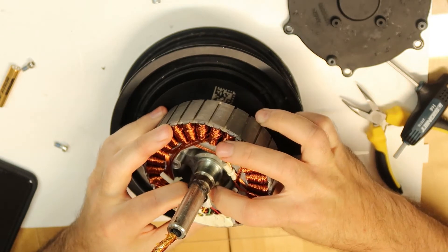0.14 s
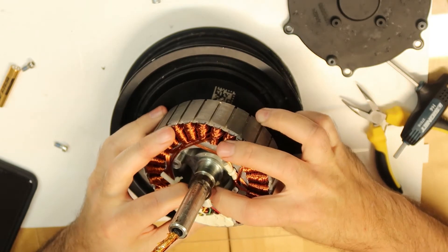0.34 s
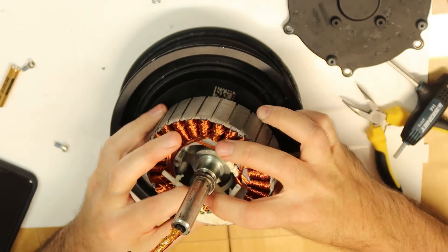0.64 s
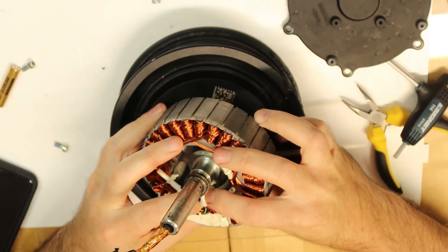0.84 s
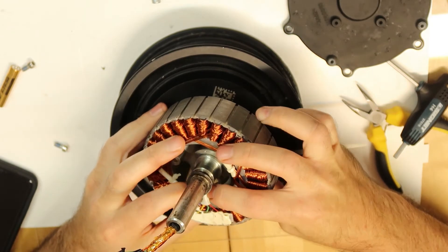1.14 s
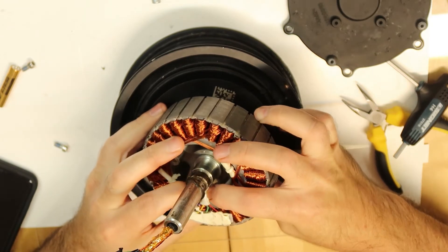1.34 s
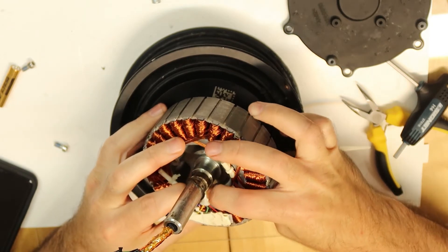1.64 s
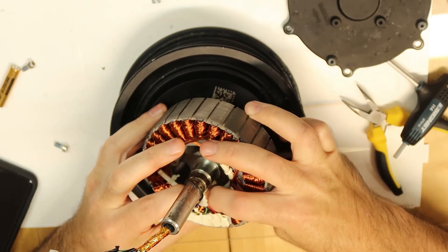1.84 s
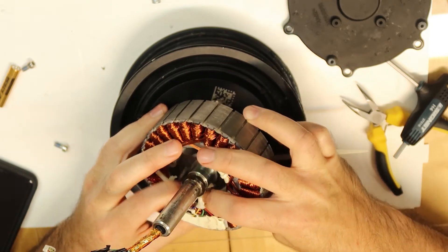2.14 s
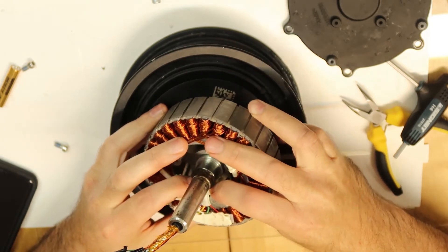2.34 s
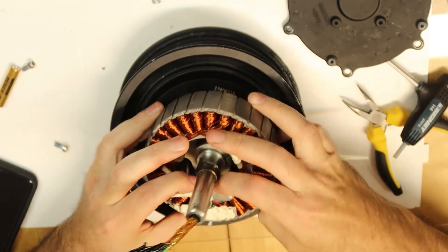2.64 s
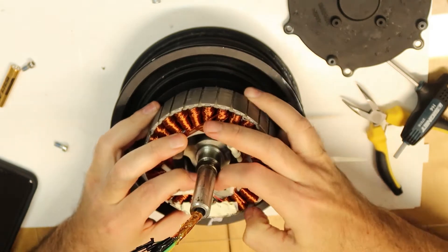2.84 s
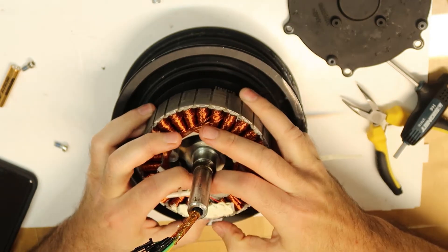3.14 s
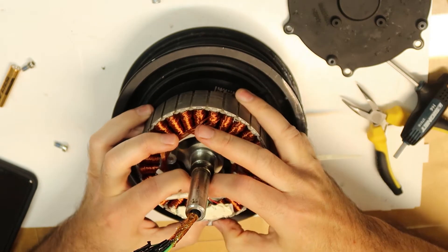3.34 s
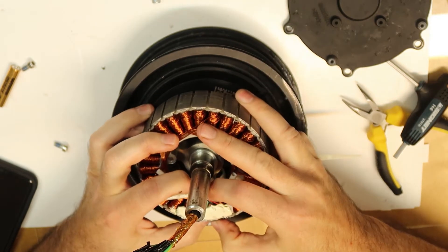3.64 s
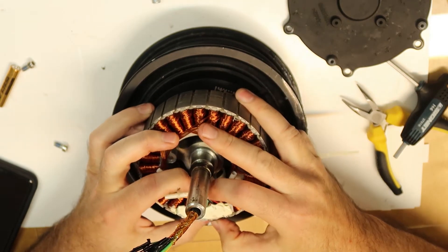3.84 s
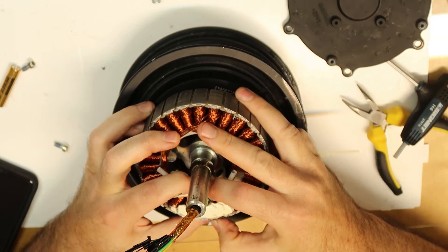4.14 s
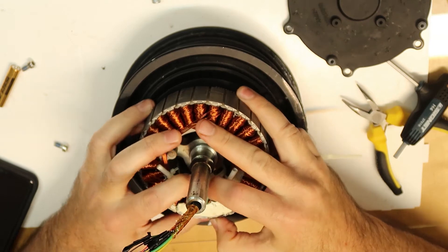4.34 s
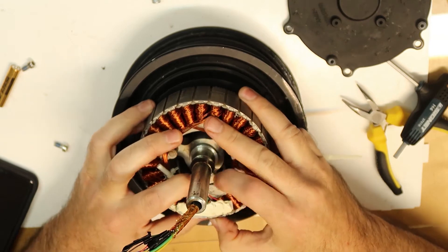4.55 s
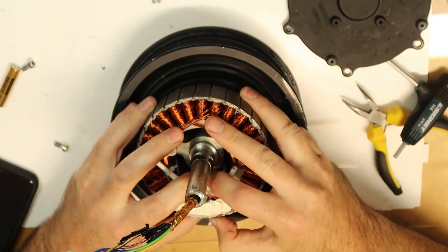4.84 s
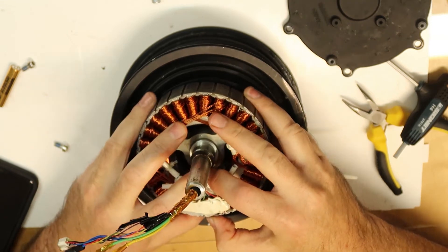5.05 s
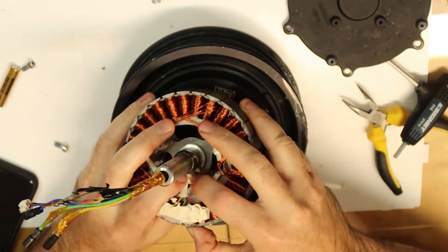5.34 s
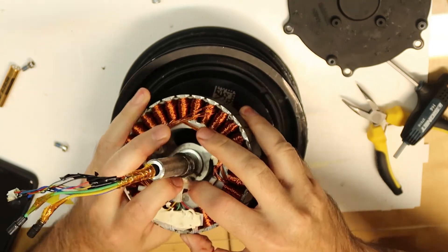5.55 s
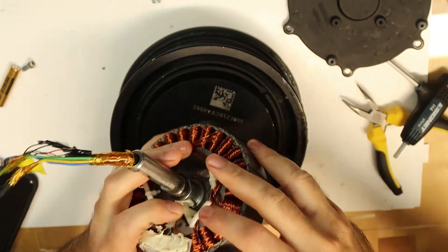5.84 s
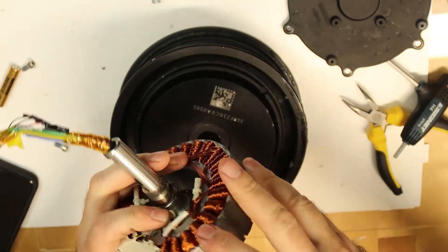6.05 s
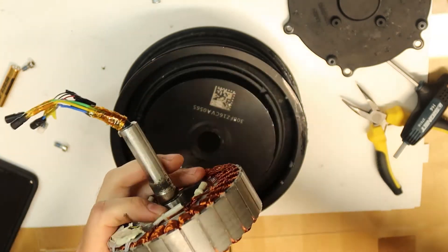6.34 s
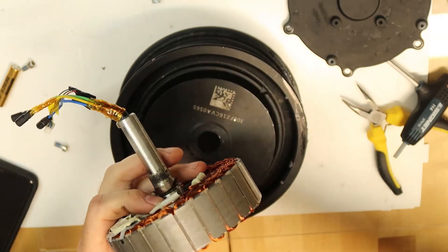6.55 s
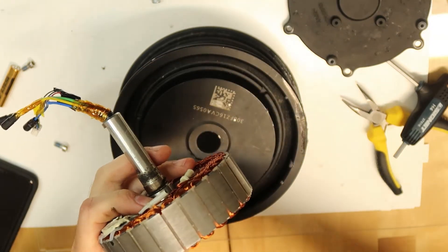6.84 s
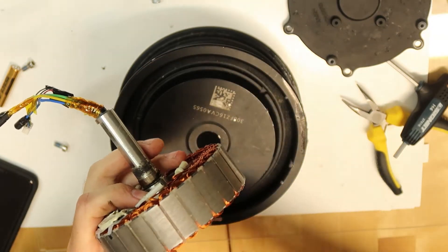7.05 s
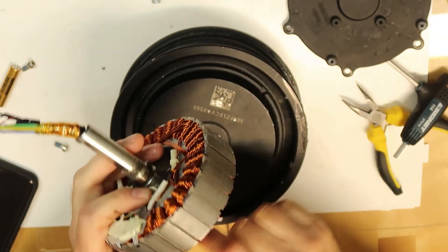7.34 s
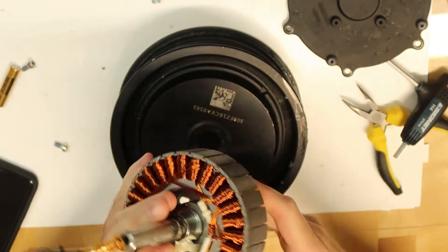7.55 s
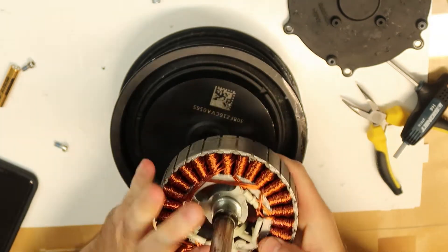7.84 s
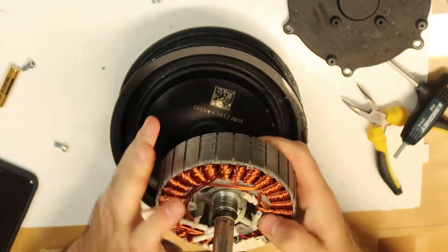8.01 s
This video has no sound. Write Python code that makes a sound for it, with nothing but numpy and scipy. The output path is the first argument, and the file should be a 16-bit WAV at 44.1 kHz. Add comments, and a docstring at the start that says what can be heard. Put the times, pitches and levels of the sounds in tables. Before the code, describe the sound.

Close view of hands working a heavy motor core out of its metal housing on a workbench. Small ticks and a soft thump come first, then one loud, deep clunk with a hard metallic knock that chatters briefly. Low, muffled bumps and faint steel ticks follow, then a dry rattle of a loose part and tiny clinks. Quiet small room, close microphone, short tail, soft room noise.

```python
"""Motor stator worked loose on a bench

A heavy motor stator is worked loose from its housing on a workbench in a quiet room, then lifted out and turned.
Its weight thuds into the modes of the bench top; housing, loose part, steel and a small part ring in modes too.
Small hard contacts snap as filtered noise bursts. Sharp sounds and thuds leave a short noise-built room tail.
Underneath lie a bench murmur fed by hand pressure and a soft, steady room noise."""
import sys
import numpy as np
from scipy import signal
from scipy.fft import rfft, irfft
from scipy.io import wavfile

SR = 44100
rng = np.random.default_rng(int(sys.argv[2]) if len(sys.argv) > 2 else 0)


def inscribe(sig):
    """Save sig as 16-bit PCM at rate SR to the path in sys.argv[1].

    A 1-D sig is mono; a 2-D sig holds one channel per row.
    Samples are clipped to [-1, 1] before scaling.
    """
    pcm = np.round(np.clip(np.atleast_2d(sig).T, -1, 1) * 32767)
    wavfile.write(sys.argv[1], SR, pcm.astype(np.int16))


N = 360738  # samples


def from_db(db):
    """Gain of a level in dB."""
    return 10 ** (np.asarray(db) / 20)


def rms_one(x):
    """Scaled to unit rms."""
    return x / np.sqrt(np.mean(x ** 2) + 1e-20)


def at_hz(points, hz, column=1):
    """One column of a table, interpolated on a log-frequency axis."""
    table = np.array(points)
    return np.interp(np.log(np.maximum(hz, 1)), np.log(table[:, 0]), table[:, column])


def add(into, s, sound):
    """Mixes a short sound in at a time in seconds."""
    i = round(s * SR)
    into[i:i + len(sound)] += sound[:N - i]


def ring(force, hz, t60_s):
    """Two-pole resonator: a unit click sets a decaying sine of height 1 ringing."""
    radius = from_db(-60 / (t60_s * SR))
    angle = 2 * np.pi * hz / SR
    feedback = [1, -2 * radius * np.cos(angle), radius * radius]
    return signal.lfilter([0, np.sin(angle)], feedback, force + 1e-18)


def favouring(favoured_hz, octave_db):
    """Mode weighting in dB: octave_db times the squared distance in octaves from the pitch favoured_hz."""
    return lambda hz: octave_db * np.log2(hz / favoured_hz) ** 2


SCATTER_DB, DETUNE = 1.5, 0.006  # largest random change of a mode per blow: level (+-dB), pitch (+-fraction)
BASS_LAG_CYCLES = 0.38  # each mode starts this part of its own cycle late


def struck(modes, force, weight_db, spread_ms, together=False):
    """One blow sets all modes ringing, each with its own strength, delay, pitch shift and (unless together) sign."""
    luck = rng.random((len(modes), 4))
    gains = from_db([db + weight_db(hz) for hz, db, t60_s in modes])
    out = np.zeros(SR // 2)
    for gain, (hz, db, t60_s), (sign, strength, wait, shift) in zip(gains, modes, luck):
        late_force = np.zeros(SR // 2)
        add(late_force, wait * spread_ms / 1000 + BASS_LAG_CYCLES / hz, force)
        polarity = 1 if together else np.sign(sign - 0.5)
        height = polarity * gain * from_db(SCATTER_DB * (2 * strength - 1))
        out += height * ring(late_force, hz * (1 + DETUNE * (2 * shift - 1)), t60_s)
    return out / np.sqrt(np.sum(gains ** 2)) / force.sum()


# Weight landing on the bench. Each row: start in seconds, level in dB,
# bass tilt in dB per octave below PIVOT_HZ, treble tilt in dB per octave above it.
THUDS = [(0.666, -34.5, -1, 3.5), (0.684, -36, -12, -17), (0.709, -30, -10.5, -11), (0.985, -18, -10, -4),
         (2.2, -36, 19, -4), (2.62, -20.5, -18, -10.5), (2.697, -3, -2.5, -1), (2.716, -14.5, -25, 6),
         (2.735, -17, 4, 8), (2.849, -22.5, -0.5, -3.5), (2.971, -42.5, -15, -6), (3.016, -43, -15, -13),
         (3.099, -42.5, -28, 3), (3.308, -20.5, -12.5, -9.5), (3.736, -36, 10, 13), (3.83, -39, 5.5, -2),
         (4.077, -33, 16, 14), (4.259, -24.5, -24, -12), (4.403, -30, -2, -17), (4.549, -39, 1, 1.5),
         (4.692, -37, 3, -9), (4.814, -24.5, -9.5, -1), (4.875, -28, 8.5, 7), (4.943, -23.5, -13.5, -12),
         (4.959, -26, -11, 2.5), (5.069, -41.5, 13, -8), (5.262, -37.5, 3, 3.5), (5.387, -45, 7.5, 13)]
# Bench-top modes. Each row: frequency in Hz, level in dB, t60 in seconds.
BENCH_MODES = [(30, -11.5, 0.25), (66, -0.5, 0.43), (96.1, -3.5, 0.56), (115.1, 6.5, 0.29), (147, 2, 0.26),
               (200.6, 0.5, 0.1), (213.2, -2, 0.27), (230.2, 0.5, 0.25), (276.3, -9.5, 0.31),
               (313.2, 2.5, 0.18), (366, -2, 0.18), (382, -6.5, 0.3), (419, 0.5, 0.22), (456.2, -4.5, 0.2),
               (514.3, -2, 0.15), (547, -1.5, 0.24), (616, -12, 0.07), (657, -18, 0.18), (746, -16, 0.28),
               (770, -14, 0.089), (861, -12.5, 0.07)]
PIVOT_HZ, LANDING_SPREAD_MS = 220, 0.94
RAP_HZ, RAP_DB = 480, -5  # extra weight of the modes above RAP_HZ
BENCH_RADIATES_HZ = 85  # below this the two faces of the bench top cancel each other


def thuds():
    """A soft push of about 1 ms excites the bench; each landing has its own bass and treble tilt about PIVOT_HZ."""
    out = np.zeros(N)
    push = np.hanning(40)
    for s, db, bass_db, treble_db in THUDS:
        def tilt(hz):
            octaves = np.log2(hz / PIVOT_HZ)
            return bass_db * max(-octaves, 0) + treble_db * max(octaves, 0) + RAP_DB * (hz > RAP_HZ)
        add(out, s, from_db(db) * struck(BENCH_MODES, push, tilt, LANDING_SPREAD_MS, together=True))
    radiation = signal.butter(2, BENCH_RADIATES_HZ, "high", fs=SR, output="sos")
    return signal.sosfilt(radiation, out)


# Housing knocked hard, bouncing and chattering. Each row: start in seconds, level in dB,
# reference pitch in Hz, weight one octave away in dB.
KNOCKS = [(2.6974, -7.5, 3100, 1.5), (2.7055, -31, 3100, 3), (2.719, -34, 2700, -10),
          (2.738, -29, 3100, -5), (2.755, -39, 3100, -20), (2.783, -31.5, 2300, -33),
          (2.838, -42, 3100, -60), (2.851, -42, 3100, -60), (2.872, -45, 3100, -58),
          (2.899, -45, 2540, -250), (2.919, -42, 2550, -250)]
# Housing modes. Each row: frequency in Hz, level in dB, t60 in seconds.
HOUSING_MODES = [(950, -14, 0.041), (1090, -7.5, 0.012), (1300, -7, 0.021), (1634, -10.5, 0.06),
                 (1830, -2.5, 0.011), (2023, -13.5, 0.06), (2300, -16, 0.12), (2350, -12.5, 0.13),
                 (2476, -10, 0.11), (2650, -6.5, 0.03), (2720, -24, 0.095), (2730, -29, 0.11),
                 (2960, -13, 0.015), (3030, -24, 0.2), (3070, 7, 0.02), (3106, -32, 0.18),
                 (3200, -27, 0.061), (3160, -10, 0.017), (3870, -20, 0.015), (4200, -27, 0.073),
                 (4540, -17, 0.044)]


def knock():
    """Housing modes driven by a pulse a little blunter than a click."""
    out = np.zeros(N)
    for s, db, reference_hz, octave_db in KNOCKS:
        weight = favouring(reference_hz, octave_db)
        add(out, s, from_db(db) * struck(HOUSING_MODES, np.hanning(12), weight, spread_ms=0.3))
    return out


# Hard little snaps. Each row: start in seconds, nominal peak in dB, body pitch in Hz,
# ring over body in dB, treble over body in dB, room send in dB.
SNAPS = [(0.129, -44.5, 1420, -4, 28, -2), (0.629, -48, 3750, -2, -3, -1), (0.657, -40, 6050, 19, -10, -9),
         (0.668, -24.5, 2470, -11, -5, -2), (0.672, -37, 5940, 0, -10, -2),
         (0.7012, -27, 3070, 5, -12, -14), (0.95, -34, 3830, 2, -17, -8), (2.093, -44, 1710, -21, -11, -4),
         (2.593, -51.5, 2490, -17, 2, 11), (2.849, -50, 3000, -1, -7, -13),
         (3.731, -49.5, 2110, 12, -11, 4), (3.821, -46, 2400, -4, 0, -1),
         (4.257, -30.5, 3150, -30, -2.5, -7), (4.547, -50, 2440, -23, -14, 3), (4.817, -44, 2340, -8, 0, 5),
         (5.103, -53, 1440, -11, 9, -3), (5.397, -43.5, 2360, -4, -18, 0), (5.634, -49, 2520, -1, -3, 6),
         (5.682, -45.5, 4440, -10, 1, -3), (5.799, -25, 1460, -10, -25, -6),
         (5.884, -44, 1350, -18, -11, 1), (6.234, -45, 2370, -4, -9, 2), (6.798, -23, 1120, -3, 5.5, 0.5),
         (6.824, -24, 2020, -26, -3, 4.5), (6.863, -20, 1900, -12, 0, -1.5), (6.833, -34, 3580, -5, -6, -6),
         (6.873, -26, 1380, -11, 1, -19), (6.946, -16, 1900, -14, 3.5, -3),
         (6.976, -18.5, 1910, -8, 1.5, -0.5), (7.016, -18, 3170, -2, -1.5, -3),
         (7.093, -20.5, 2140, -16, 0.5, -4.5), (7.37, -47, 2840, 3, -15, -5),
         (7.555, -39, 2140, -21, -14, -2.5), (7.656, -47, 5970, -24, 2, 7),
         (7.914, -47.5, 1070, -13, 15, 0)]
SNAP_CREST_DB = 21.5  # nominal peak over rms
BODY_Q, RING_Q, TREBLE_HZ = 0.85, 14.0, 4850
WINDOW_MS, DECAY_MS = 1.7, 1.7 / 0.3  # time constants before and after whitening


def snaps():
    """Short bursts through a broad body resonance, a narrow ring and a bright edge: sound close by, room send."""
    near, far = np.zeros(N), np.zeros(N)
    t_ms = np.arange(1500) / SR * 1000
    noises = rng.standard_normal((len(SNAPS), 1500))
    edge = signal.butter(2, TREBLE_HZ, "high", fs=SR, output="sos")
    for (s, db, hz, ring_db, treble_db, room_db), noise in zip(SNAPS, noises):
        spectrum = rfft(noise * np.exp(-t_ms / WINDOW_MS))
        whitened = irfft(spectrum / np.abs(spectrum))
        burst = whitened * np.exp(-t_ms / DECAY_MS)
        body = signal.lfilter(*signal.iirpeak(hz, BODY_Q, fs=SR), burst)
        body = signal.lfilter(*signal.butter(2, 0.33 * hz, "high", fs=SR), body)  # too small to radiate bass
        narrow = signal.lfilter(*signal.iirpeak(hz, RING_Q, fs=SR), burst)
        treble = signal.sosfilt(edge, burst)
        blend = rms_one(body) + from_db(ring_db) * rms_one(narrow) + from_db(treble_db) * rms_one(treble)
        snap = from_db(db - SNAP_CREST_DB) * rms_one(blend)
        add(near, s, snap)
        add(far, s, from_db(room_db) * snap)
    return near, far


# Loose part rattling. Each row: start in seconds, level in dB, reference pitch in Hz, weight one octave away in dB.
RATTLES = [(6.799, -26, 1150, 0), (6.823, -31, 1600, 3), (6.863, -32, 1900, -3), (6.945, -28, 4000, -11),
           (6.976, -29, 1900, -0.5), (7.017, -30, 3370, -2), (7.094, -39, 2900, -5)]
# Loose-part modes. Each row: frequency in Hz, level in dB, t60 in seconds.
LOOSE_PART_MODES = [(1130, -2, .05), (1700, 0, .04), (1900, 0, .035), (2750, -7, .03), (3300, -5, .025),
                    (3750, -5, .025), (4600, -9, .02), (5840, -6, .025), (6500, -8, .02), (10200, -5, .012),
                    (12700, -6, .012), (14700, -8, .012)]


def rattle():
    """Clicks set the loose part's modes ringing, each contact in a colour of its own."""
    out = np.zeros(N)
    for s, db, reference_hz, octave_db in RATTLES:
        weight = favouring(reference_hz, octave_db)
        add(out, s, from_db(db) * struck(LOOSE_PART_MODES, np.ones(1), weight, spread_ms=0.8))
    return out


# Steel touching steel. Each row: start in seconds, level in dB, brightness in dB per octave about 2480 Hz.
TOUCHES = [(0.9864, -37, -13.5), (1.039, -48, -25), (1.139, -60.5, -19), (1.7222, -47.5, -2.5),
           (2.6235, -44, -23), (2.689, -43, -8), (2.715, -40, -2.5), (2.737, -38, -12), (2.8, -62, -12),
           (2.918, -54, -25), (3.057, -49, -15), (3.122, -65, -4), (3.829, -54, -15), (4.818, -38.5, 0.5),
           (4.885, -49.5, -4), (4.972, -53, -4)]
# Steel modes. Each row: frequency in Hz, level in dB, t60 in seconds.
STEEL_MODES = [(2390, -3, .04), (2445, -6, .16), (2485, -9, .12), (4170, -4, .12), (4225, -6, .1),
               (4334, -8, .08), (4520, -7, .05), (7320, -6, .08), (10550, -11, .06), (11430, -13, .05),
               (12880, -11, .06)]


def steel_touches():
    """Light hard contacts: single clicks into the steel modes."""
    out = np.zeros(N)
    for s, db, tilt_db in TOUCHES:
        touch = struck(STEEL_MODES, np.ones(1), lambda hz: tilt_db * np.log2(hz / 2480), spread_ms=0.26)
        add(out, s, from_db(db) * touch)
    return out


# Small part clinking. Each row: start in seconds, level in dB, favoured pitch in Hz.
CLINKS = [(7.657, -53, 9400), (7.66, -52, 9300), (7.678, -57, 4300), (7.692, -52, 3800), (7.718, -55, 4400),
          (7.762, -63, 9000), (7.697, -60, 6100), (7.71, -61, 6200), (7.918, -57, 4500), (8.065, -59, 7500)]
# Small-part modes. Each row: frequency in Hz, level in dB, t60 in seconds.
SMALL_PART_MODES = [(4190, -2, 0.06), (4370, 0, .07), (5500, 4, .07), (5660, -3, 0.06), (6160, 6, 0.08),
                    (7900, -6, 0.18), (10230, -4, 0.088), (13000, -10, .15)]
CLINK_OCTAVE_DB = -90  # weight one octave from the favoured pitch


def clinks():
    """Single clicks into the small part, each sounding mainly the modes near its favoured pitch."""
    out = np.zeros(N)
    for s, db, favoured_hz in CLINKS:
        weight = favouring(favoured_hz, CLINK_OCTAVE_DB)
        add(out, s, from_db(db) * struck(SMALL_PART_MODES, np.ones(1), weight, spread_ms=0.31))
    return out


# Early reflections. Each row: delay in ms, level in dB, lowpass corner in Hz.
REFLECTIONS = [(1.7, -6.5, 14000), (6.5, -3.5, 3000)]


def echoes(x):
    """The direct sound plus duller early reflections off bench and wall."""
    out = x.copy()
    for ms, db, lowpass_hz in REFLECTIONS:
        dulled = signal.lfilter(*signal.butter(1, lowpass_hz, fs=SR), x)
        add(out, ms / 1000, from_db(db) * dulled)
    return out


# Room tail. Each row: frequency in Hz, t60 in seconds, gain on band noise in dB, side over mid in dB.
ROOM = [(314, 0.48, -40.5, -35), (850, 0.36, -22.5, -21), (1960, 0.39, -26, -16), (5230, 0.41, -23, -3),
        (8200, 0.52, -31, 2.5), (14000, 0.36, -31.5, 7)]
GRAIN_DB, GRAIN_S, BUILD_MS = 2.5, 0.06, 1.6  # unevenness, its time constant, linear onset


def room(x):
    """Convolution with half-octave noise bands, each with its own decay and width; uneven at first, then smooth."""
    t = np.arange(SR // 2) / SR
    white = rng.standard_normal((2, 2, len(t)))
    edges_hz = 150 * 2 ** np.arange(0, 7.1, 0.5)
    tail = 0
    for k, (low, high) in enumerate(zip(edges_hz, edges_hz[1:])):
        band = signal.butter(2, [low, high], "band", fs=SR, output="sos")
        mid, side = signal.sosfilt(band, white[k % 2])
        hz = np.sqrt(low * high)
        decay = from_db(at_hz(ROOM, hz, column=2) - 60 * t / at_hz(ROOM, hz, column=1))
        width = from_db(at_hz(ROOM, hz, column=3))
        tail = tail + decay * (mid + width * side * [[1], [-1]])
    steps = np.repeat(rng.standard_normal(len(t) // 50), 50)
    tail = tail * from_db(GRAIN_DB * steps * np.exp(-t / GRAIN_S))
    tail = tail * np.minimum(t * 1000 / BUILD_MS, 1)
    return signal.fftconvolve(x[None], tail, axes=1)[:, :N]


# Hands pressing and shifting the load. Each row: time in seconds, murmur level in dB.
PRESSING = [(0, -57.5), (.6, -55), (1.3, -59.5), (1.6, -54.5), (3, -53.5), (3.5, -55.5), (4.1, -52),
            (4.45, -48), (4.6, -56), (5, -51), (5.498, -57.5), (6.4, -58.5), (7, -55), (8.18, -58.5)]


def bench_murmur():
    """Noise from unsteady hand pressure feeds the bench modes without a break."""
    s, db = np.transpose(PRESSING)
    force = rng.standard_normal((2, N))
    hum = np.zeros(N)
    for k, (hz, mode_db, t60_s) in enumerate(BENCH_MODES):
        weighted_db = mode_db - 4.7 * abs(np.log2(hz / 160))
        hum += from_db(weighted_db) * ring(force[k % 2], hz, t60_s)
    return from_db(np.interp(np.arange(N) / SR, s, db)) * rms_one(hum)


# Room-noise spectrum. Each row: frequency in Hz, relative density in dB per Hz.
AIR_SPECTRUM = [(15, 4), (27, 2.5), (42, -13), (52, -7), (64, -2), (82, -21.5), (115, -11), (160, -10.5),
                (240, -10.5), (400, -9), (560, -16), (800, -14.5), (1000, -19.5), (3600, -27),
                (12000, -40.5), (16500, -58)]
# Room-noise width. Each row: frequency in Hz, side over mid in dB.
AIR_SIDE = [(60, -29), (130, -7.5), (290, -3.5), (640, -4.5), (1410, 0), (3100, -1), (6820, -1), (15000, 4)]
AIR_MID_DB = -52  # rms of the mid signal


def air():
    """Steady shaped noise, nearly alike in both channels only in the bass."""
    hz = np.fft.rfftfreq(N, 1 / SR)
    mid, side = rfft(rng.standard_normal((2, N))) * from_db(at_hz(AIR_SPECTRUM, hz))
    level = from_db(AIR_MID_DB) / np.std(irfft(mid, N))
    return level * irfft(mid + from_db(at_hz(AIR_SIDE, hz)) * side * [[1], [-1]], N)


def scene():
    """Bench and metal sounds sit in the centre; thuds and bright contacts also excite the room."""
    bench, clank, loose = thuds(), knock(), rattle()
    near, far = snaps()
    ringing = steel_touches() + clinks()
    send = far + from_db(-6.5) * bench + from_db(-14.5) * clank + from_db(-13) * loose + from_db(-12) * ringing
    direct = bench + clank + ringing + echoes(near + loose)
    return direct + room(send) + bench_murmur() + air()


CUTOFF_HZ = 16600  # stopband edge, 70 dB down


def record(dry):
    """Rounds the loudest peaks with tanh and cuts the top."""
    rounded = 1.1 * np.tanh(dry / 1.1)
    return signal.sosfilt(signal.cheby2(10, 70, CUTOFF_HZ, fs=SR, output="sos"), rounded)


dry = scene()
out = record(dry)
inscribe(out)
```